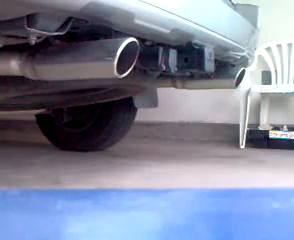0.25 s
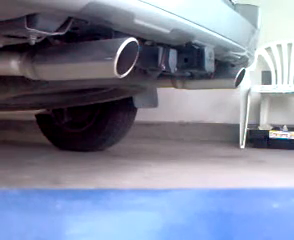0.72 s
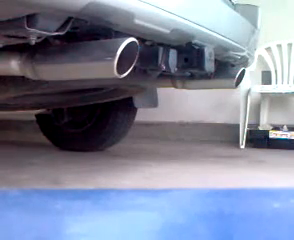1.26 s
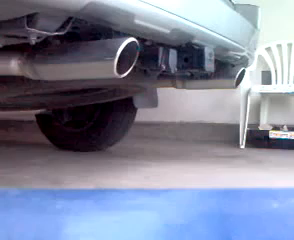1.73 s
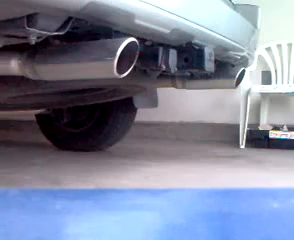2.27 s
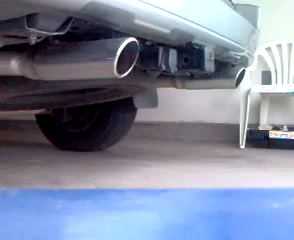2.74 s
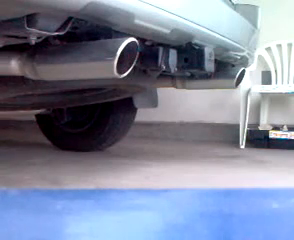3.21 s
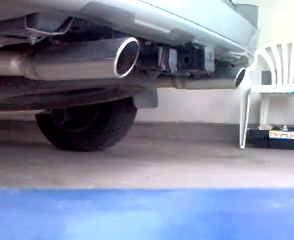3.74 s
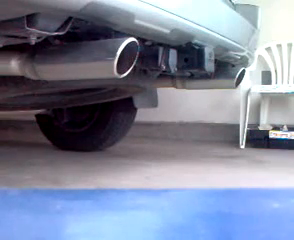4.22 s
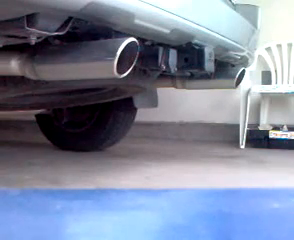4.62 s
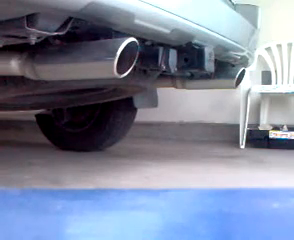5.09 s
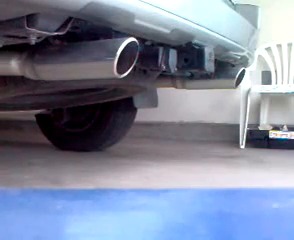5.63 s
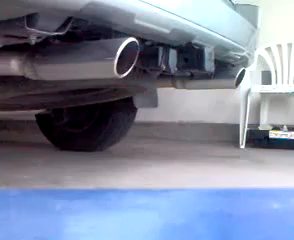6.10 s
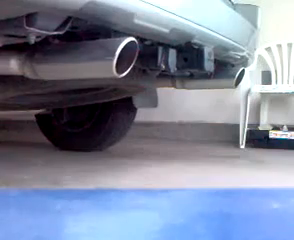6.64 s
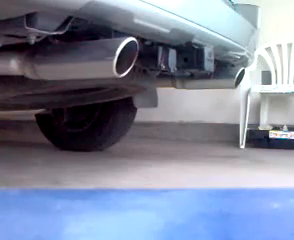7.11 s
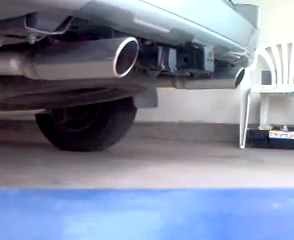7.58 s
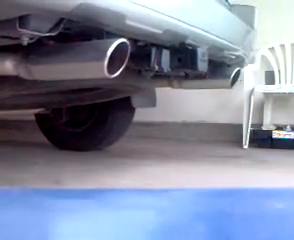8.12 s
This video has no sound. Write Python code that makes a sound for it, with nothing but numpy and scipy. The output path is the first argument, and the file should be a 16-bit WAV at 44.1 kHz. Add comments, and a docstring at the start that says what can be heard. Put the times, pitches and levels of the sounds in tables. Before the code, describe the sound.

Close to the tailpipe in a garage, a deep V8 drops to idle after a quick throttle tap, then shifts into gear with clunks.

```python
"""In a garage, beside the tailpipe of a cross-plane V8: the engine falls back from a rev, gets a quick
tap of throttle and idles, then clunks into gear and labours at low speed as the car starts to creep away.
Each cylinder fires a pulse of gas, and these uneven pulses make the exhaust pipe ring in a deep burble.
Gas and the fan rush above it, with a faint whine from the engine bay."""
import sys
import numpy as np
from scipy import signal
from scipy.fft import rfft, irfft, next_fast_len
from scipy.io import wavfile
from scipy.ndimage import uniform_filter1d, minimum_filter1d, map_coordinates

SR = 44100
rng = np.random.default_rng(int(sys.argv[2]) if len(sys.argv) > 2 else 0)


def master(y):
    """Save y as 16-bit WAV."""
    cut = np.clip(np.atleast_2d(y).T, -1, 1)
    pcm = np.round(cut * 32767)  # scale
    wavfile.write(sys.argv[1], SR, pcm.astype(np.int16))


N = 368235
T = np.arange(N) / SR

# how fast the crankshaft spins: t/s, speed/rpm
ENGINE_SPEED = [(0, 3794), (.3, 2952), (.5, 2515), (.8, 1777), (1, 1467), (1.4, 1276), (2.05, 1201),
                (2.16, 1620), (2.26, 2272), (2.42, 2513), (2.64, 2359), (2.8, 1938), (3, 1585),
                (3.45, 1262), (3.8, 1192), (6, 1116), (6.44, 1058), (6.62, 798), (6.78, 760.5), (7.05, 804),
                (7.2, 858.7), (8, 829), (8.35, 803)]
# how hard the engine works: t/s, load (0 to 1)
ENGINE_LOAD = [(0, 0.11), (.48, 0.47), (.62, 0.2), (.92, 0.56), (1.15, 0.43), (2.02, 0.33), (2.11, 0.77),
               (2.18, 0.87), (2.32, .62), (2.52, 0), (2.72, .55), (3, .62), (3.35, .4), (5.9, 0.24),
               (6.35, 0.6), (6.8, 0.47), (7, .88), (7.4, 0.71), (8.35, 0.94)]
# the sound dips after the first rev and comes back with the throttle tap: t/s, level/dB
OVERALL_LEVEL = [(0, 3.5), (1.1, -7.5), (2.03, -8.5), (2.12, -1.5), (3.2, 1), (4, 0), (6, -0.1), (7.5, 0),
                 (8.35, 0)]


def amp(db):
    """Turn decibels into a gain to multiply by."""
    return 10 ** (np.asarray(db) / 20)


def unit(x):
    """Scale x to an average (rms) level of 1."""
    return x / np.sqrt(np.mean(x ** 2) + 1e-20)


def curve(rows):
    """Join (time, value) points with straight lines, one value per sample."""
    return np.interp(T, *np.transpose(rows))


def swell(at_s, half_s, db):
    """A gain that rises and falls smoothly around one moment."""
    return amp(db) * np.exp(-((T - at_s) / half_s) ** 2)


def wobble(per_s):
    """A smooth curve through per_s random points a second."""
    points = rng.standard_normal(int(N * per_s / SR) + 4)
    steps = np.arange(0, len(points) - 1, 1 / 8)
    return np.interp(T * per_s, steps, map_coordinates(points, [steps]))


def filtered(x, response):
    """Scale and delay each frequency f in x by response(f)."""
    size = next_fast_len(N + SR // 2)
    return irfft(rfft(x, size) * response(np.fft.rfftfreq(size, 1 / SR)), size)[:N]


def ring(x, modes):
    """Let x ring an object's resonances, the pitches at which it likes to vibrate."""
    return filtered(x, lambda f: sum(amp(db) * 1j * f * width / (hz * hz - f * f + 1j * f * width)
                                     for hz, width, db in modes))


def band(x, lo_hz, hi_hz, order):
    """Keep what lies between two frequencies; a higher order cuts more steeply."""
    return filtered(x, lambda f: ((1 + (lo_hz / (f + 1)) ** order) * (1 + (f / hi_hz) ** order)) ** -.5)


def noise(spectrum):
    """Noise at level 1 whose tone colour follows (frequency, level) points."""
    hz, db = np.transpose(spectrum)
    white = rng.standard_normal(N)
    return unit(filtered(white, lambda f: amp(np.interp(np.log(f + 1), np.log(hz), db))))


def fuzzy_tone(hz, width_hz):
    """Narrow noise around a steady or moving pitch."""
    phase = 2 * np.pi * np.cumsum(hz * np.ones(N)) / SR
    return unit(wobble(width_hz) * np.sin(phase) + wobble(width_hz) * np.cos(phase))


def steadied(x, span_s=0.09):
    """Even out slow changes in level; single beats keep their shape."""
    window = np.hanning(int(span_s * SR))
    power = signal.fftconvolve(x ** 2, window, "same") / signal.fftconvolve(np.ones(N), window, "same")
    return x / np.sqrt(np.abs(power) + 1e-20)


def turns():
    """Crankshaft turns since the start."""
    return np.cumsum(curve(ENGINE_SPEED) / 60) / SR


def octaves(idle_rpm=1150):
    """Engine speed in octaves (doublings) above idle."""
    return np.log2(curve(ENGINE_SPEED) / idle_rpm)


def labouring(slow_rpm=850, free_rpm=1050):
    """1 while the gear drags the engine below idle, 0 while it runs free."""
    return np.interp(curve(ENGINE_SPEED), [slow_rpm, free_rpm], [1, 0])


def garage(x, decay_s=0.32, echo_db=-4):
    """Add a short wash of echoes from the floor, the walls and the car's underside."""
    age = T[:SR // 4]
    tail = rng.standard_normal(len(age)) * amp(-60 * age / decay_s)
    return x + amp(echo_db) * signal.fftconvolve(x, tail / np.linalg.norm(tail))[:N]


def whine(db_per_octave=7):
    """Faint, fuzzy tones from the engine bay get louder with speed."""
    # the tones at idle: f/Hz, level/dB
    bay_tones = [(982, -51.5), (1199, -48), (1466, -54), (2454, -55.5), (3254, -60), (3573, -59),
                 (4561, -55.5), (5910, -66)]
    tones = sum(amp(db) * fuzzy_tone(hz, width_hz=28) for hz, db in bay_tones)
    return tones * amp(db_per_octave * octaves() + curve(OVERALL_LEVEL))


def intake(high_hz=2140, low_hz=1032, from_s=2.33, fall_s=.06):
    """Air whooshes through the intake after the throttle tap, sinking in pitch."""
    hz = low_hz + (high_hz - low_hz) * np.exp(-np.maximum(T - from_s, 0) / fall_s)
    return swell(at_s=2.48, half_s=.25, db=-38) * fuzzy_tone(hz, width_hz=380)


def gas_and_fan(pulses, puff_s=0.0052):
    """Each pulse puffs swirling gas out of the pipe; the fan hisses more steadily. Both grow with speed."""
    # tone colour of the gas: f/Hz, relative level/dB
    gas_colour = [(250, 10.5), (420, 2), (620, 9), (1000, 8.5), (1400, 3.5), (2200, 2), (3100, -33.5),
                  (5300, -120)]
    # tone colour of the fan: f/Hz, relative level/dB
    fan_colour = [(1120, -7), (1900, -5.5), (2080, -7.5), (2210, -2), (2480, 0), (2700, -1.5), (3580, -3),
                  (4310, -5), (4510, -6), (4890, -8.5), (6450, -11.5), (7270, -15.5), (7530, -23),
                  (9790, -51.5), (16600, -120)]
    # short hisses around the gear change: t/s, half length/s, level/dB
    gear_hisses = [(6.088, .07, -36), (6.432, 0.11, -34)]
    puffs = unit(signal.lfilter([1], [1, -np.exp(-1 / (puff_s * SR))], np.abs(pulses)))

    def flow(colour, puffing, idle_db, db_per_octave):
        """Rushing noise that throbs with the puffs."""
        throbbing = noise(colour) * (1 - puffing + puffing * puffs)
        return steadied(throbbing) * amp(idle_db + db_per_octave * octaves())

    gas = flow(gas_colour, puffing=0.22, idle_db=-34, db_per_octave=6)
    fan = flow(fan_colour, puffing=0.13, idle_db=-35.5, db_per_octave=3)
    gust_db = 0.06 * wobble(5)
    hisses = noise(fan_colour) * sum(swell(*row) for row in gear_hisses)
    return (gas + fan) * amp(gust_db + curve(OVERALL_LEVEL)) + hisses


def clunks(attack_s=.014):
    """The gear selector, transmission and brake knock, ringing the casing and the steel parts."""
    # the knocks: t/s, thud level/dB, clank level/dB, time to fade by 60 dB/s
    knocks = [(6.111, -16.5, -64, 0.27), (6.746, -38.5, -23.5, .55), (7.327, -30, -32, 0.59)]
    # resonances of the casing: f/Hz, width/Hz, relative level/dB
    casing = [(666, 330, 0), (980, 290, -3), (1530, 75, -8), (3000, 1500, -26)]
    # resonances of the steel parts: f/Hz, width/Hz, relative level/dB
    steel = [(1290, 160, 10.5), (1500, 120, 9), (3070, 940, -0.5), (4200, 700, -4.5), (5330, 250, 4.5),
             (6500, 250, -9.5), (6700, 150, -15.5), (7340, 140, -8)]
    out = np.zeros(N)
    for start_s, thud_db, clank_db, decay_s in knocks:
        age = np.maximum(T - start_s, 0)
        thud = amp(thud_db) * unit(ring(rng.standard_normal(N), casing))
        clank = amp(clank_db) * unit(ring(rng.standard_normal(N), steel))
        out += (thud + clank) * (1 - np.exp(-age / attack_s)) * amp(-60 * age / decay_s)
    return out


def crank_tones(fade_s=0.044):
    """Clean tones sing out over the burble for a while, their pitch locked to the crankshaft."""
    # a four-stroke cycle lasts two turns, so beats per turn come in halves and wholes
    # the tones: start/s, end/s, beats per turn, level/dB
    tones = [(-.1, 0.533, 2.5, -16), (-.1, 0.295, 4.5, -25), (-.1, .15, 6, -24), (0.75, 1.027, 4, -20),
             (1.093, 1.44, 8, -30.5), (2.112, 2.2, 12, -18.5), (2.2, 2.424, 4, -16.5),
             (2.263, 2.528, 6.5, -25.5), (2.663, 2.791, 3, -12), (2.795, 2.96, 4, -15),
             (3.216, 3.499, 8, -23), (6.147, 6.476, 12, -25), (7.093, 8.25, 10.5, -21.5),
             (7.052, 8.25, 2.5, -27.5)]
    angle, out = 2 * np.pi * turns(), np.zeros(N)
    for start, end, beats, db in tones:
        fade = np.clip(np.minimum(T - start, end - T) / fade_s + .5, 0, 1)
        out += amp(db + wobble(18)) * fade * np.sqrt(2) * np.sin(beats * angle)
    return out


def rasp(pulses, base_db=-66.5, db_per_octave=1.5, load_db=47.5):
    """A hard, buzzing rasp at the firing rate, like overload, when the throttle opens at speed."""
    db = base_db + db_per_octave * octaves() + load_db * curve(ENGINE_LOAD) + curve(OVERALL_LEVEL)
    equal_pulses = np.abs(np.sign(pulses))
    return amp(db) * (1 - labouring()) * unit(band(equal_pulses, 300, 540, order=8))


def firings(light_load=0.55, heavy_load=0.62, free_scatter=.17, load_scatter=.09, jitter=.014):
    """The cylinders fire in turn, four pulses to a crankshaft turn; load makes the burning steadier."""
    # eight cylinders in firing order, the near bank the loud one: strength running free, under load
    cylinders = [(0.36, 1.4), (-0.071, 0.37), (0.35, 0.79), (0.47, 1.2), (0.13, 0.33), (0.18, 0.79),
                 (-0.37, 0.055), (0.32, 0.11)]
    at = np.flatnonzero(np.diff(np.floor(4 * turns())))
    strain = np.interp(curve(ENGINE_LOAD), [light_load, heavy_load], [0, 1])
    strain = np.maximum(strain, labouring())[at]
    free, loaded = np.array(cylinders)[np.arange(len(at)) % len(cylinders)].T
    size_luck, time_luck = rng.standard_normal((len(at), 2)).T
    size = (1 - strain) * (free + free_scatter * size_luck) + strain * (loaded + load_scatter * size_luck)
    # each firing comes early or late by a small share of the gap between firings
    shift = np.round(jitter * np.gradient(at) * time_luck).astype(int)
    return np.bincount(np.clip(at + shift, 0, N - 1), size, N)


def pipe_gain(peaks, base_db, db_per_octave, load_db, hz, width_hz):
    """A range of the pipe's sound follows speed and load, and swells as an engine tone meets its pitch."""
    flutter_db, limit_db, follow_s = 1.52, 1.5, 0.0083
    turn_hz = curve(ENGINE_SPEED) / 60
    boost = 1 + sum(amp(db) ** 2 / (1 + ((beats * turn_hz - hz) / width_hz) ** 2) ** 2
                    for beats, db in peaks)
    level_db = base_db + db_per_octave * octaves() + load_db * curve(ENGINE_LOAD) + curve(OVERALL_LEVEL)
    gain = np.sqrt(boost) * amp(level_db + flutter_db * wobble(8))  # fuel never burns quite evenly
    gain = gain / np.hypot(1, (gain / amp(limit_db)) ** 2) ** .5  # losses in the pipe cap the level
    lag = np.exp(-1 / (follow_s * SR))  # the pipe takes a moment to follow a change
    return gain[0] + signal.lfilter([1 - lag], [1, -lag], gain - gain[0])


def rumble(pipe, idle_share=0.57, drone_octaves=0.17):
    """The pipe's lowest range; near idle a clean drone, three beats to a turn, takes over part of it."""
    # engine tones that swell the rumble: beats per turn, strength/dB
    peaks = [(1, 5.5), (3, 10.5), (4, 13.5)]
    share = idle_share * np.exp(-(octaves() / drone_octaves) ** 2)
    drone = np.sqrt(2) * np.sin(2 * np.pi * 3 * turns())
    low = share * drone + np.sqrt(1 - share ** 2) * steadied(band(pipe, 38, 66, order=14))
    gain = pipe_gain(peaks, base_db=-37, db_per_octave=-2.1, load_db=12.5, hz=56.5, width_hz=4)
    after_tap = swell(at_s=2.83, half_s=0.18, db=-18.5)  # extra rumble as the throttle tap dies away
    return steadied(low) * np.hypot(gain, after_tap)


def boom(pipe, delay_s=0.0014):
    """The pipe's middle range, which grows strongly when the engine works hard."""
    # engine tones that swell the boom: beats per turn, strength/dB
    peaks = [(2, 3.5), (2.5, 7), (3, 2), (4, 13.5), (5, -8), (5.5, 4), (8, 9)]
    middle = filtered(band(pipe, 85, 122.7, order=24), lambda f: np.exp(-2j * np.pi * f * delay_s))
    gain = pipe_gain(peaks, base_db=-31.5, db_per_octave=4, load_db=24, hz=105.5, width_hz=5)
    return steadied(middle) * gain


def bark(pipe, sharp_hz=340, blunt_hz=220, blunt_rpm=860, sharp_rpm=1070, smear_s=0.01206):
    """The pipe's upper range; a slow engine opens its valves slowly and sends blunter pulses."""
    # engine tones that swell the bark: beats per turn, strength/dB
    peaks = [(2.5, -1.5), (4, -3)]
    upper = band(pipe, 135.2, 900, order=20)
    # the muffler's chambers hold back higher tones longer, which fills the gaps between pulses
    upper = filtered(upper, lambda f: np.exp(-1j * np.pi * smear_s * f * f / sharp_hz))
    sharp, blunt = band(upper, 0, sharp_hz, order=6), band(upper, 0, blunt_hz, order=6)
    sharpness = np.interp(curve(ENGINE_SPEED), [blunt_rpm, sharp_rpm], [0, 1])
    echoing = garage(sharpness * sharp + (1 - sharpness) * blunt)
    gain = pipe_gain(peaks, base_db=-28, db_per_octave=5, load_db=11, hz=155.5, width_hz=8.5)
    return steadied(echoing) * gain


def exhaust(pulses):
    """The firing pulses ring the exhaust pipe, which sounds in three pitch ranges."""
    # resonances of the pipe: f/Hz, width/Hz, relative level/dB
    resonances = [(33, 10, -13), (57.2, 4.2, 1), (110.67, 12.2, 3.5), (150, 19.7, -0.5), (174, 52, -8),
                  (205, 25, -9), (245, 14, -11), (265, 13, -5), (322, 20, -9), (360, 30, -9.5),
                  (456, 22, -20)]
    pipe = ring(pulses, resonances)
    return rumble(pipe) + boom(pipe) + bark(pipe)


def scene():
    """Everything heard beside the tailpipe, in one channel."""
    pulses = firings()
    engine = exhaust(pulses) + rasp(pulses) + crank_tones()
    return (engine + gas_and_fan(pulses) + whine() + intake() + clunks())[None]


def record(dry):
    """A limiter turns down the loudest swings, their tips are rounded and the high treble is cut."""
    ceiling, hold_samples, hardness, top_hz = 1.15, int(.024 * SR), 6, 7700
    needed_gain = np.minimum(1, ceiling / (np.abs(dry[0]) + 1e-9))
    limited = dry[0] * uniform_filter1d(minimum_filter1d(needed_gain, hold_samples), hold_samples)
    rounded = limited / (1 + np.abs(limited) ** hardness) ** (1 / hardness)
    return filtered(rounded, lambda f: f < top_hz)[None]


dry = scene()
out = record(dry)
master(out)
```